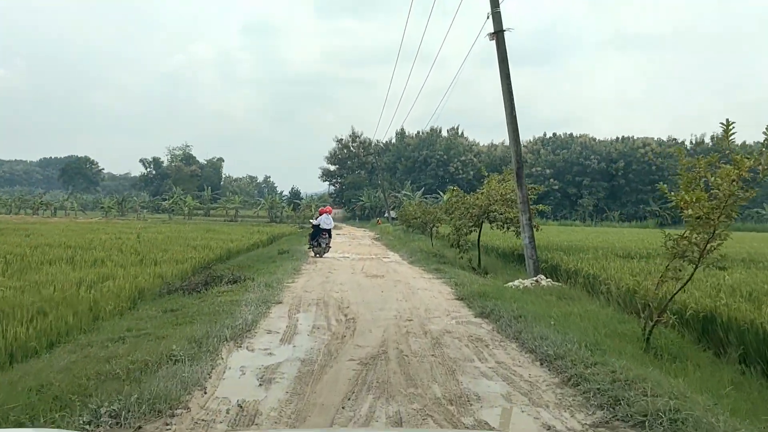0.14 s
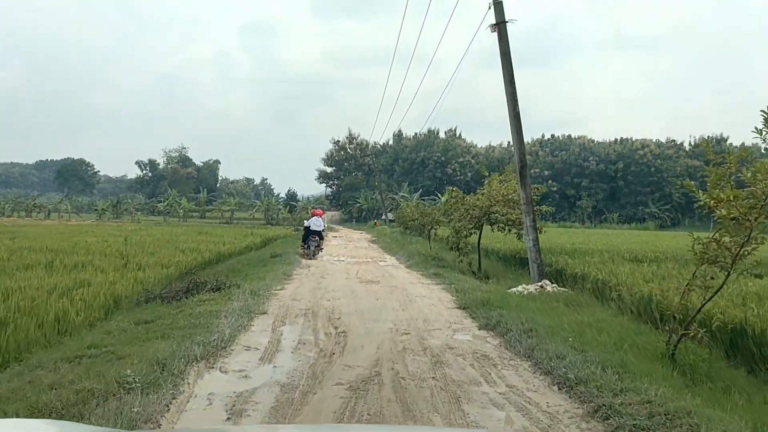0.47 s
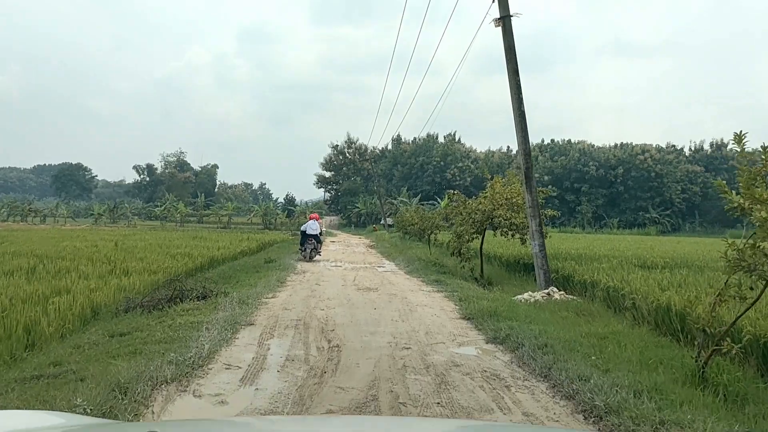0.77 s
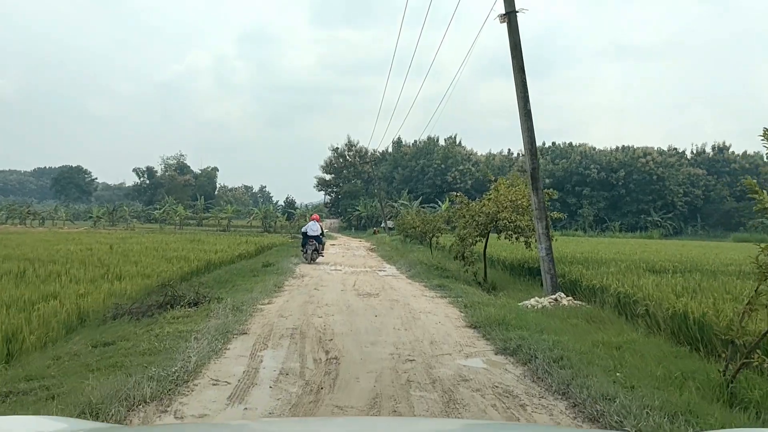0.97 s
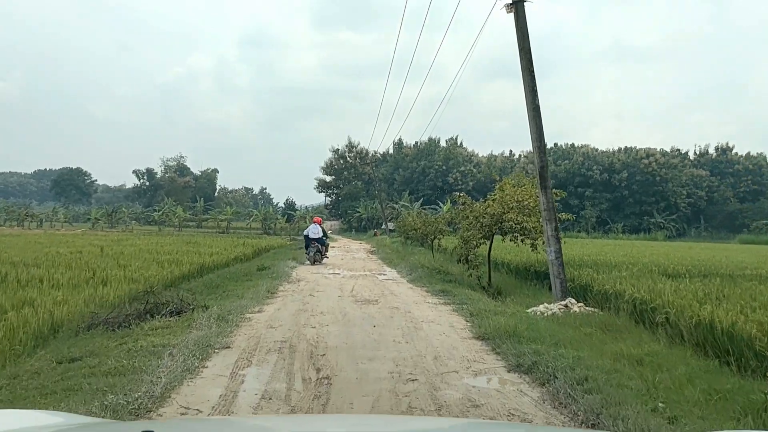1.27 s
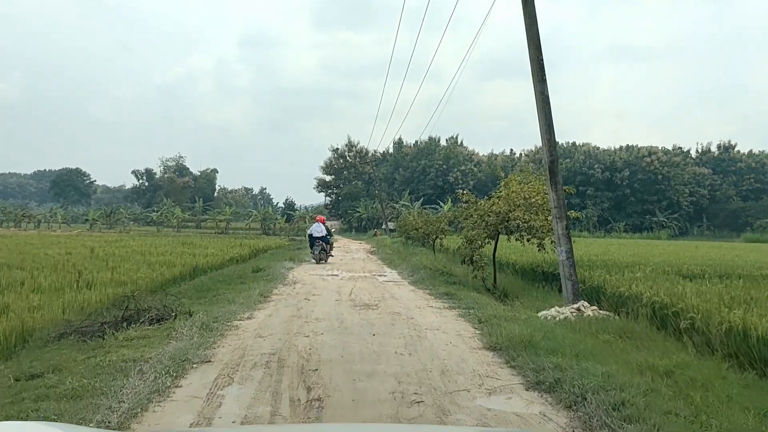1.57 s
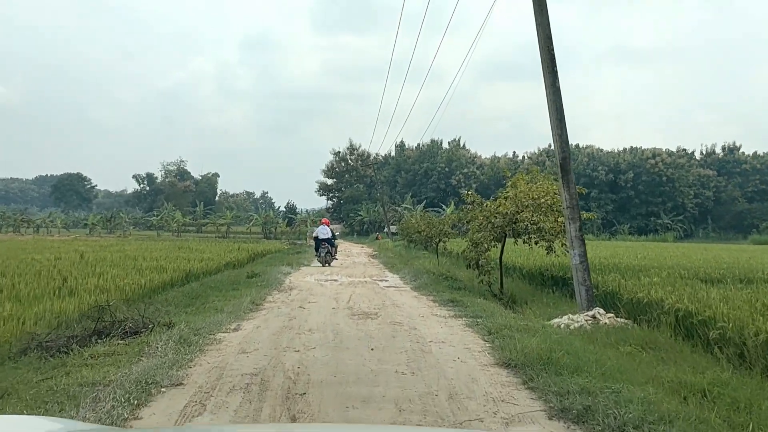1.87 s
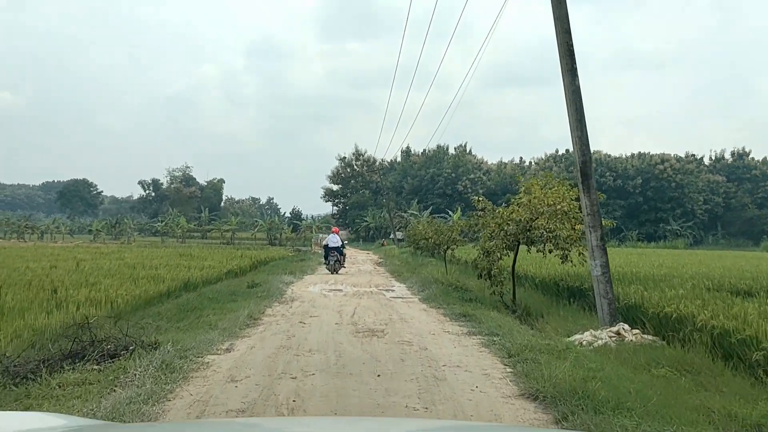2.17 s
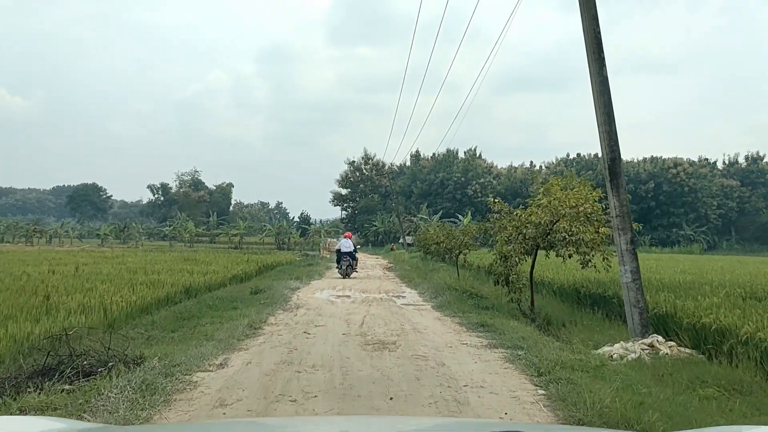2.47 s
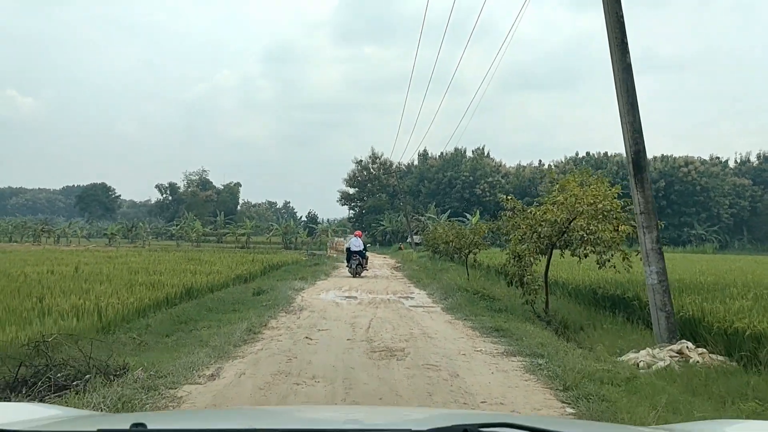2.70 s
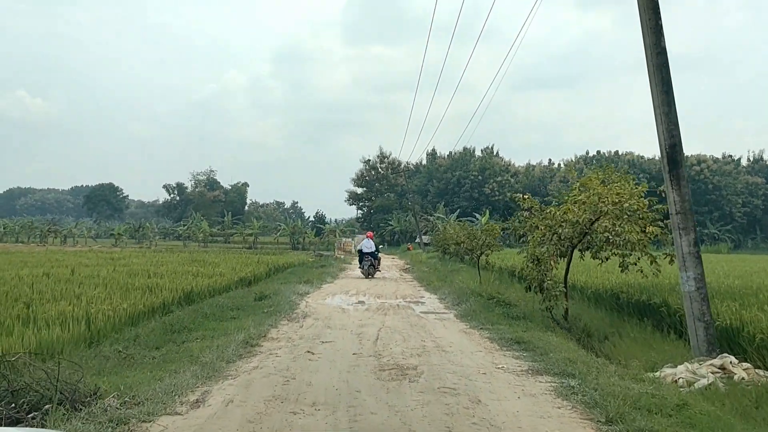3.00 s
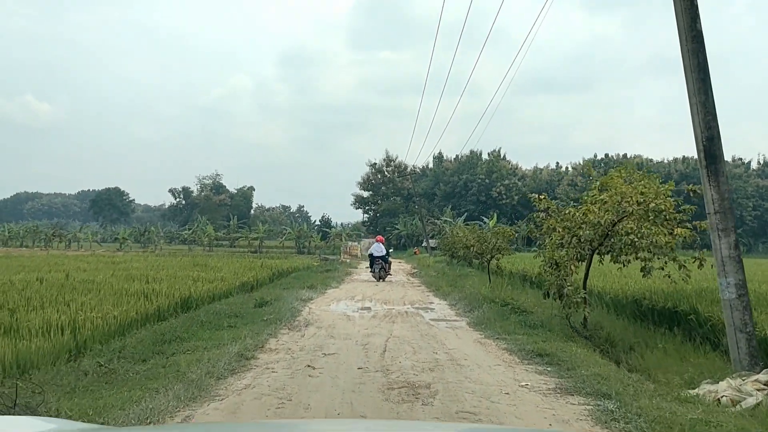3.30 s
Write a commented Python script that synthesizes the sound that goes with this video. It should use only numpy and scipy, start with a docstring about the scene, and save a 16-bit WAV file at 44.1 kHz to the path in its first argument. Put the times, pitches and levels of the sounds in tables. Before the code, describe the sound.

Low rumble inside a car crawling along a bumpy dirt road, its trim rattling and knocking.

```python
"""Inside a car on a rutted dirt track

The car crawls along, and each rut sets the cabin air booming. Trim and loose things rattle in
bursts of tiny clicks, the suspension thuds through the low modes of the panels, and plastic knocks.
Underneath runs road noise: rumble, drone, tyre roar, narrow body resonances and a soft hiss of
grit and air."""
import sys
import numpy as np
from scipy import signal
from scipy.io import wavfile

SR = 44100
rng = np.random.default_rng(int(sys.argv[2]) if len(sys.argv) > 2 else 0)


def wav_record(signal):
    """Record a signal, one row per channel, as 16-bit PCM in the file named by sys.argv[1]."""
    frames = np.transpose(np.atleast_2d(signal))
    bounded = np.clip(frames, -1, 1)
    # unit amplitude maps onto the largest positive 16-bit level
    quanta = np.round(bounded * 32767).astype(np.int16)
    wavfile.write(sys.argv[1], SR, quanta)


N = 152145
TIME = np.arange(N) / SR
LEFT_RIGHT = np.array([[1], [-1]])


def from_db(db):
    """Amplitude grows tenfold for every 20 dB."""
    return 10 ** (np.asarray(db) / 20)


def unit_rms(x):
    """Dividing by the root mean square gives unit power."""
    return x / np.sqrt(np.mean(x ** 2) + 1e-20)


def at_hz(points, hz):
    """Pitch is logarithmic, so a curve is interpolated in log frequency."""
    frequencies, values = np.transpose(points)
    return np.interp(np.log(hz), np.log(frequencies), values)


def drift(rate_hz):
    """Low-passed noise wanders slowly, with a spread near 1."""
    step = 40   # samples between draws
    pole = np.exp(-2 * np.pi * rate_hz * step / SR)
    slow = signal.lfilter([1], [1, -2 * pole, pole * pole], rng.standard_normal(N // step + 2002))[2000:]
    return np.interp(np.arange(N) / step, np.arange(len(slow)), unit_rms(slow))


def ring(force, hz, t60):
    """A damped resonator answers a unit impulse with a decaying unit sine."""
    r, w = from_db(-60 / (t60 * SR)), 2 * np.pi * hz / SR
    return signal.lfilter([0, np.sin(w)], [1, -2 * r * np.cos(w), r * r], force + 1e-18)


# Likeness of the cabin sound at the two ears. Each row: frequency in Hz, correlation.
EAR_CORRELATION = [(25, 0.92), (60, 1), (125, 0.79), (250, 0.92), (500, 0.26), (1000, 0.011), (8000, 0.016)]
def stereo(mid, side, hz):
    """Interaural correlation: long waves reach both ears alike, short ones do not."""
    alike = np.clip(at_hz(EAR_CORRELATION, hz), -1, 1)
    return np.sqrt(1 + alike) * mid + np.sqrt(1 - alike) * side * LEFT_RIGHT


def banded_noise(spectrum, flicker_db, flicker_hz):
    """Random amplitude modulation: third-octave bands flicker partly in step, at a total rms of 1."""
    out, common = 0, drift(flicker_hz)
    bottom_hz, top_hz = spectrum[0][0], min(spectrum[-1][0], 16000)
    edges = bottom_hz * 2 ** np.arange(0, np.log2(top_hz / bottom_hz) + .3, 1 / 3)
    white = rng.standard_normal((2, 2, N + SR // 2))
    for k, (low, high) in enumerate(zip(edges, edges[1:])):
        band = signal.butter(2, [low, high], "band", fs=SR, output="sos")
        mid, side = signal.sosfilt(band, white[k % 2])[:, SR // 2:]
        hz = np.sqrt(low * high)
        flicker = 2 * np.tanh(.35 * (common + drift(flicker_hz)))
        out = out + from_db(at_hz(spectrum, hz) + flicker_db * flicker) * stereo(mid, side, hz)
    return unit_rms(out)


# Spectrum of the rumble. Each row: frequency in Hz, relative density in dB.
RUMBLE_SPECTRUM = [(7.1, -29), (12, -2.5), (27, -9.5), (38, -8), (51, -10), (86, -33.5), (110, -13.5),
                   (140, -50.5), (240, -120)]
# Course of the rumble. Each row: time in seconds, level in dB.
RUMBLE_LEVELS = [(0, -22), (1.5, -24), (2.2, -29), (3.45, -30)]
def rumble():
    """Slowly modulated low-frequency noise is heard as a loose rumble between ruts."""
    level_db = np.interp(TIME, *np.transpose(RUMBLE_LEVELS))
    return from_db(level_db) * banded_noise(RUMBLE_SPECTRUM, flicker_db=5.5, flicker_hz=1.4)


# Resonances of the body. Each row: frequency in Hz, bandwidth in Hz, level in dB.
BODY_RESONANCES = [(69.3, 2, -57), (129.4, 20, -40), (140.2, 24, -42), (284.6, 7.4, -43), (380.8, 3.7, -45)]
def cabin_tones():
    """Resonance: the body picks narrow tones out of the road noise."""
    out = 0
    for hz, width, db in BODY_RESONANCES:
        driven = ring(rng.standard_normal((2, N + SR // 2)), hz, t60=2.2 / width)
        mid, side = unit_rms(driven[:, SR // 2:])
        out = out + from_db(db - 3) * stereo(mid, side, hz)
    return out


# Course of the road noise. Each row: time in seconds, then drone, roar, hiss and treble levels in dB.
ROAD_LEVELS = [(0.0, -29, -30.5, -42.5, -63.5), (0.388, -28.5, -33.5, -41.5, -69),
               (0.819, -30.5, -35.5, -41.5, -67.5), (1.36, -43, -37.5, -45.5, -72.5),
               (1.822, -34, -34, -40, -64.5), (2.2, -36, -34.5, -42, -69), (2.46, -35, -36, -42, -73),
               (2.51, -41, -38, -40.5, -66), (2.679, -33.5, -30.5, -38.5, -64),
               (2.77, -39, -42, -42.5, -68), (2.818, -35, -38.5, -46, -69),
               (2.971, -43.5, -39.5, -44.5, -66), (3.45, -36, -38.5, -41.5, -64.5)]
# Spectra of those four layers. Each row: frequency in Hz, relative density in dB.
DRONE_SPECTRUM = [(62, -36.5), (105, -7.5), (151, -2), (200, -0.5), (260, -34), (440, -120)]
ROAR_SPECTRUM = [(110, -37), (190, -13.5), (232, -1.5), (281, -4), (393, -4.5), (714, -21), (800, -18.5),
                 (1040, -42.5), (1760, -120)]
HISS_SPECTRUM = [(290, -24.5), (500, 0), (716, -20.5), (853, -5), (1510, -11.5), (1940, -11), (3130, -15.5),
                 (4030, -15), (5850, -25), (8000, -45), (10400, -75), (17600, -120)]
TREBLE_SPECTRUM = [(4120, -16), (7000, -10), (8690, -10.5), (11200, -7.5), (13800, -14), (15500, -47)]
def road_noise():
    """Broadband excitation: tyres, grit and air make noise, and the cabin tones follow the tyre roar."""
    times, *levels = np.transpose(ROAD_LEVELS)
    drone_db, roar_db, hiss_db, treble_db = [np.interp(TIME, times, level) for level in levels]
    drone = from_db(drone_db) * banded_noise(DRONE_SPECTRUM, flicker_db=2, flicker_hz=9.7)
    roar = from_db(roar_db) * banded_noise(ROAR_SPECTRUM, flicker_db=3, flicker_hz=4.06)
    tones = from_db(roar_db - roar_db.mean()) * cabin_tones()
    hiss = from_db(hiss_db) * banded_noise(HISS_SPECTRUM, flicker_db=2, flicker_hz=16.6)
    treble = from_db(treble_db) * banded_noise(TREBLE_SPECTRUM, flicker_db=3, flicker_hz=11)
    return drone + roar + tones + hiss + treble


# Ruts that shake the body. Each row: start in seconds, level in dB, settled pitch in Hz,
# time until release in seconds.
RUTS = [(0.019, -19, 29.4, 0.021), (0.096, -11.5, 26.8, 0.055), (0.161, -17, 24.8, 0.1),
        (0.252, -11, 22.9, 0.092), (0.369, -14.5, 29.2, 0.03), (0.443, -8.5, 26, 0.035),
        (0.59, -16.5, 29.4, 0.055), (0.647, -19, 26.7, 0.049), (0.712, -11, 34.4, 0.093),
        (0.834, -20.5, 29.8, 0.2), (.96, -16, 38, 0.079), (1.019, -8, 28.2, 0.072),
        (1.154, -11, 26.1, 0.053), (1.218, -18.5, 27.3, 0.068), (1.328, -13.5, 24.3, 0.07),
        (1.45, -17.5, 27.3, 0.075), (1.574, -20.5, 31.8, 0.054), (1.677, -28, 30.6, 0.071),
        (1.842, -22, 25.3, 0.08), (2.058, -21.5, 26, 0.051), (2.686, -4, 28.8, 0.073),
        (2.772, -24, 29.8, 0.023), (2.876, -21, 29.8, 0.11), (2.987, -24.5, 27.3, 0.073),
        (3.136, -28, 25.3, 0.11), (3.289, -21.5, 22.9, 0.069)]
def cabin_booms():
    """Transient response: each rut swings the cabin air briefly, falling about an octave in pitch."""
    attack_s, release_s = 0.0058, 0.011
    overshoot, settle_s = 0.99, 0.013
    floor_hz, floor_db, floor_fade_s = 60, -9.5, 0.029   # a higher mode, of the floor pan
    ear_spread_db = 0.73
    out = np.zeros((2, N))
    for (start, db, hz, length), lean in zip(RUTS, rng.normal(0, 1, len(RUTS))):
        t = np.maximum(TIME - start, 0)
        attack = 1 - np.exp(-t / attack_s)
        release = np.exp(-.5 * (np.maximum(t - length, 0) / release_s) ** 2)
        turns = hz * (t + overshoot * settle_s * (1 - np.exp(-t / settle_s)))
        floor_pan = from_db(floor_db) * np.exp(-t / floor_fade_s) * np.sin(2 * np.pi * floor_hz * t)
        gain = np.sqrt(2) * from_db(db + ear_spread_db * lean * LEFT_RIGHT)
        out += gain * attack * release * (np.sin(2 * np.pi * turns) + floor_pan)
    return out


# Rattles of trim and loose things. Each row: start in seconds, relative level in dB,
# band centre in Hz, bandwidth in octaves, time until the fade in seconds.
TRIM_RATTLES = [(0.092, -52.5, 3000, 2.1, 0.024), (0.154, -46, 1330, 1.2, 0.01),
                (0.565, -41, 920, 0.74, 0.0066), (0.906, -41.5, 900, 2, 0.0099),
                (1.035, -43, 1260, 1.5, 0.019), (1.242, -47, 1640, 0.67, 0.019),
                (0.289, -47, 3500, 1.14, 0.029), (0.387, -52, 3230, 1.2, 0.0049),
                (.474, -72, 3010, 1, .005), (0.409, -50.5, 3540, 0.5, 0.01), (0.5, -48, 3880, 0.88, 0.007),
                (0.57, -58, 4230, 0.78, 0.0035), (0.716, -48.5, 3930, 0.78, 0.025),
                (0.784, -45, 1340, 1.8, 0.031), (0.909, -50.5, 3850, 0.88, 0.037),
                (1.189, -46.5, 3780, 1.2, 0.0021), (1.278, -48.5, 3440, 1.1, 0.0033),
                (1.554, -47.5, 6450, 1.6, 0.004), (1.604, -41, 4600, 0.57, 0.0068),
                (1.601, -57, 8250, 0.69, 0.0057), (1.705, -47.5, 3370, 1.3, 0.0067),
                (2.028, -43.5, 2110, 0.49, 0.022), (2.491, -53, 3900, 0.52, .02),
                (2.53, -49, 2030, .4, 0.01), (2.558, -59.5, 10500, 0.79, 0.013),
                (2.618, -52.5, 3700, 0.42, 0.063), (2.694, -38.5, 850, 1.85, 0.025),
                (2.704, -37.5, 2860, 0.93, 0.013), (2.71, -52, 5900, .8, 0.028),
                (2.755, -46.5, 2970, 0.53, 0.0043), (3.228, -55, 10300, 2.6, 0.017),
                (3.252, -50.5, 5700, 0.75, 0.019), (3.368, -57, 10100, 1.4, .008),
                (3.371, -48, 3200, 0.74, 0.027)]
def trim_rattles():
    """Shot noise: a loose part makes a flurry of random clicks in a band of its own."""
    clicks_per_s, fade_s = 2200, .004
    tail_db, tail_s = -11.5, 0.0067   # fainter clicks trail off
    ring_db, ring_t60_s = -35, .016
    upholstery = signal.butter(2, 5500, fs=SR, output="sos")   # absorbs the treble
    out, size = np.zeros((2, N + SR)), SR // 5
    t = np.arange(size) / SR
    for start, db, hz, octaves, length in TRIM_RATTLES:
        clicks = (rng.random((2, size)) < clicks_per_s / SR) * rng.standard_normal((2, size))
        clicks[:, 0] = rng.choice([-1, 1], 2)
        after = np.maximum(t - length, 0)
        envelope = np.exp(-after / fade_s) + from_db(tail_db) * np.exp(-after / tail_s)
        clicks *= envelope
        low, high = hz / 2 ** (octaves / 2), min(hz * 2 ** (octaves / 2), 14000)
        pitches = low * (high / low) ** rng.random(8)   # each part rings faintly at its own pitches
        clicks += from_db(ring_db) * sum(ring(clicks, pitch, ring_t60_s) for pitch in pitches)
        burst = signal.sosfilt(signal.butter(1, [low, high], "band", fs=SR, output="sos"), clicks)
        burst = signal.sosfilt(upholstery, burst)
        burst /= np.sqrt(np.mean(burst ** 2, axis=1, keepdims=True) / np.mean(envelope ** 2))
        onset = int(start * SR)
        out[:, onset:onset + size] += from_db(db + 3.5) * burst
    return out[:, :N]


# Blows from the suspension. Each row: start in seconds, relative level in dB, pitch in Hz,
# 60 dB decay time at that pitch in seconds, tilt of the modes in dB per octave.
SUSPENSION_BLOWS = [(0.178, -21, 231, 0.069, -6), (.595, -26, 199.6, 0.049, 9),
                    (0.713, -26, 160.4, 0.18, -10), (1.24, -33.5, 188.5, 0.11, -10),
                    (1.642, -18.5, 197.5, 0.069, -8), (1.706, -21, 188, 0.049, -5),
                    (1.737, -17, 194, 0.056, -6), (1.852, -16.5, 216, 0.037, 5),
                    (2.618, -23, 145.6, 0.069, -1.5), (2.734, -18.5, 131, 0.038, -26)]
# Modes of the panels. Each row: multiple of the pitch, relative level in dB.
PANEL_MODES = [(0.682, -7.5), (1.008, 7.5), (1.302, 4.5), (1.6, -10.5), (2.1, -5.5), (2.501, -6),
               (3.001, -14)]
def suspension_thuds():
    """Modal vibration: a soft blow and its rebound excite panel modes, the higher dying sooner."""
    swell_s, rebound_s, rebound_db = 0.0066, .022, -7
    detune_spread, ear_spread_turns = 0.064, 0.14
    out, t = np.zeros((2, N + SR)), np.arange(SR // 2) / SR
    swell = 1 - np.exp(-t / swell_s)
    for start, db, hz, t60, tilt_db in SUSPENSION_BLOWS:
        for blow_s, blow_db in [(start, db), (start + rebound_s, db + rebound_db)]:
            onset = int(blow_s * SR)
            for multiple, mode_db in PANEL_MODES:
                lean, phase, detune = rng.normal(0, 1, 3)
                mode_hz = hz * (1 + (multiple - 1) * (1 + detune_spread * detune))
                turns = mode_hz * t + phase + ear_spread_turns * lean * LEFT_RIGHT / 2
                decay = from_db(-60 * t * multiple ** 0.11 / t60)
                gain = from_db(blow_db + mode_db + tilt_db * np.log2(multiple) + 6.5)
                out[:, onset:onset + len(t)] += gain * swell * decay * np.sin(2 * np.pi * turns)
    return out[:, :N]


# Dry knocks on plastic. Each row: start in seconds, relative level in dB.
PLASTIC_STRIKES = [(1.807, -19), (2.662, -34)]
# Modes of the plastic. Each row: frequency in Hz, relative level in dB, 60 dB decay time in seconds.
PLASTIC_MODES = [(774, -3, 0.042), (1067, -7.5, 0.055), (1150, 6.5, 0.037), (1290, 14, 0.009),
                 (1535, 1, 0.024), (1670, -4.5, 0.041), (2150, -6.5, 0.047), (2590, -8.5, 0.052),
                 (3330, -26, 0.024)]
def plastic_knocks():
    """Impact excitation: a strike and a dying cluster of touches set the plastic's modes ringing."""
    touches_db, touches_fade_s = 4, .004
    soft_contact = signal.butter(2, 3500, fs=SR, output="sos")   # a soft blow carries little treble
    force, t = np.zeros((2, N)), np.arange(SR // 50) / SR
    for start, db in PLASTIC_STRIKES:
        touches = from_db(touches_db) * rng.standard_normal((2, len(t))) * np.exp(-t / touches_fade_s)
        touches /= np.sqrt(touches_fade_s * SR)
        touches[:, 0] = 1   # the strike itself, alike at both ears
        onset = int(start * SR)
        force[:, onset:onset + len(t)] += from_db(db - 10) * touches
    force = signal.sosfilt(soft_contact, force)
    return sum(from_db(db) * (-1) ** k * ring(force, hz, t60)
               for k, (hz, db, t60) in enumerate(PLASTIC_MODES))


def scene():
    """Superposition: the pressures of all sources add at the dashboard."""
    balance_db = -0.1   # left against right
    mix = rumble() + road_noise() + cabin_booms() + suspension_thuds() + plastic_knocks() + trim_rattles()
    return mix * from_db(balance_db / 2 * LEFT_RIGHT)


def record(dry):
    """Soft saturation rounds the largest swings, and a low-pass filter cuts the top treble."""
    rounded = dry / (1 + dry ** 8) ** (1 / 8)
    return signal.sosfilt(signal.cheby2(12, 70, 16000, fs=SR, output="sos"), rounded)


dry = scene()
out = record(dry)
wav_record(out)
```